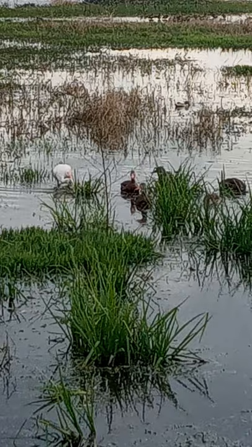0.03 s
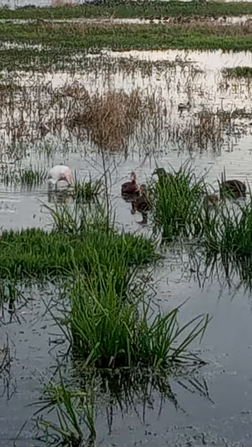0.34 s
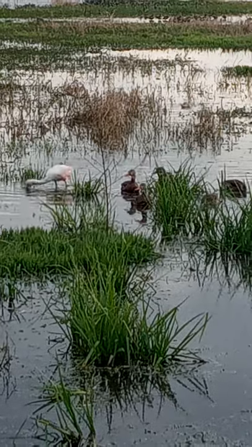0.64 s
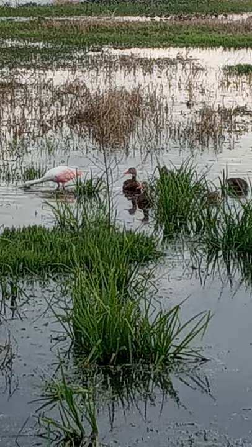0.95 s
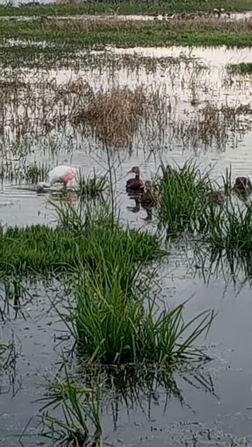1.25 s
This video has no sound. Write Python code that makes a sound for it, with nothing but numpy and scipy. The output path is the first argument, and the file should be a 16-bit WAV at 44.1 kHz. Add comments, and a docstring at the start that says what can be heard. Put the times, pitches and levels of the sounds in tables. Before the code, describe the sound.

Whistling ducks chatter across a marsh, starting with falling whistles and rising chirps, then quick peeps, soft rasps and one light knock. The nearest duck peeps sharply near the end, with faint wind and far birds behind.

```python
"""Whistling ducks chatter across an echoing marsh, heard in mono from the bank.
First come long falling whistles and rising chirps, as a distant flock, far birds and low wind fade in.
Arched peeps and sharp chips run on throughout, each a harmonic tone with a gliding pitch. Near 1 s the
nearest duck peeps piercingly; a small hollow knock follows, then rasps of noise shaped by a throat.
In the last second the piercing peeps return, joined by three harsh squeaks."""
import sys
import numpy as np
from scipy import signal
from scipy.fft import rfft, irfft
from scipy.io import wavfile
from scipy.ndimage import uniform_filter1d, map_coordinates

SR = 44100
rng = np.random.default_rng(int(sys.argv[2]) if len(sys.argv) > 2 else 0)


def put_to_file(sound):
    """Save the sound as 16-bit audio at rate SR, in the file named by the first command-line argument."""
    columns = np.atleast_2d(sound).T  # one column per channel
    safe = np.clip(columns, -1, 1)
    whole_steps = np.round(safe * 32767)
    wavfile.write(sys.argv[1], SR, whole_steps.astype(np.int16))


N = 176400
T = np.arange(N) / SR

# change of harmonics 1-5 over the dive of a peep: gain_db
PEEP_DIVE = [-14.5, -5, -8.5, -15, 3]
# change of harmonics 1-5 over the dive of a chip: gain_db
CHIP_DIVE = [-8.5, 3.5, 3.5, 0, -4]
PEEP_DROP, CHIP_DROP = 0.21, 0.24  # fraction of the top pitch lost over the fall


def voice(pitch_hz, levels_db, dive=0, dive_db=(0, 0, 0, 0, 0)):
    """Harmonic series: overtones follow multiples of one jittering pitch, each fluttering in level."""
    n = len(pitch_hz)
    jitter, flutter_db, cutoff_hz = 0.006, 0.9, 10100
    phase = 2 * np.pi * np.cumsum(pitch_hz * (1 + jitter * wander(n, 390.5))) / SR
    levels = [*levels_db, levels_db[-1] - 10, levels_db[-1] - 20]  # two weaker overtones on top
    tone = np.zeros(n)
    for k, (db, change_db) in enumerate(zip(levels, dive_db), 1):
        hz = k * pitch_hz
        treble_rolloff = (hz < SR / 2) * (.06 + .94 / np.sqrt(1 + (hz / cutoff_hz) ** 44))
        flutter = flutter_db * (k + 1.5) * wander(n, 237.8)
        tone += treble_rolloff * amp(db + change_db * dive + flutter) * np.sin(k * phase)
    return np.sqrt(2) * tone


def arch(drop, dive_db, top_s, rise_s, fall_s, top_hz, *levels_db):
    """Frequency modulation: pitch rises and dives on two parabolas, shifting the harmonic balance."""
    attack_s, release_s = 0.0032, 0.011
    t = np.arange(0, rise_s + fall_s * 1.05 + attack_s / 2, 1 / SR)
    lead_s = rise_s + attack_s / 2
    width_s = np.where(t < lead_s, max(fall_s, 1.7 * rise_s), fall_s)
    bend = ((t - lead_s) / width_s) ** 2
    tone = voice(top_hz * (1 - drop * bend), levels_db, np.minimum(bend, 1), dive_db)
    return top_s - lead_s, gate(t, attack_s, release_s) * tone


def peeps():
    """Arched glides whose lower harmonics fade as the pitch sinks."""
    # peeps: top_s, rise_s, fall_s, top_hz, harmonic1_db, harmonic2_db, harmonic3_db
    notes = [(0.409, 0.039, 0.045, 2475, -52.5, -52.5, -71), (0.614, 0.039, 0.03, 2600, -76, -59.5, -83),
             (0.652, 0.021, 0.081, 2510, -66, -62, -62.5), (0.714, 0.0064, 0.028, 2540, -47, -51, -58),
             (0.791, 0.014, 0.039, 2389.0, -52.5, -52.5, -56), (0.877, 0.005, 0.043, 2504, -67, -52, -64),
             (0.888, 0.012, 0.035, 2423, -57.5, -50.5, -56), (1.041, 0.019, 0.065, 3173, -48.5, -49.5, -59),
             (1.09, 0.034, 0.052, 2526, -53.5, -51.5, -53.5), (1.193, 0.014, 0.03, 2520, -49, -49, -49.5),
             (1.305, 0.023, 0.039, 2436, -55, -45, -50.5), (1.441, 0.017, 0.052, 2236.0, -59, -46.5, -56),
             (1.602, 0.023, 0.098, 2140, -81, -59, -70), (1.74, 0.015, 0.05, 2297, -59.5, -64, -64.5),
             (1.935, 0.024, 0.067, 2840, -56, -56, -80), (1.942, 0.046, 0.034, 2242, -57.5, -50, -56.5),
             (2.038, 0.026, 0.025, 2510, -66, -59, -70), (2.203, 0.025, 0.044, 2458, -50.0, -60.0, -62.5),
             (2.318, 0.035, 0.037, 2570, -80, -62.5, -57.5), (2.528, 0.023, 0.036, 2314, -65, -54.5, -69),
             (2.59, 0.01, 0.034, 2188, -62.0, -57.5, -62), (2.688, 0.011, 0.037, 2277.0, -61.0, -54, -59),
             (2.79, 0.017, 0.035, 2390, -56, -50.5, -55.5), (2.819, 0.011, 0.024, 2840, -50.5, -60.5, -77),
             (2.835, 0.016, 0.034, 2250, -72, -50.5, -61), (2.884, 0.02, 0.044, 2360, -56, -57, -58),
             (2.93, 0.0073, 0.026, 2350, -69, -73, -60.5), (2.985, 0.02, 0.048, 2390, -53, -50.5, -60),
             (3.086, 0.016, 0.046, 2437, -53.5, -47.5, -62), (3.157, 0.02, 0.062, 2547, -50.5, -63, -60.5),
             (3.183, 0.018, 0.045, 2460.0, -52.5, -48.5, -58),
             (3.247, 0.01, 0.034, 2612, -47, -48.5, -63.5), (3.278, 0.025, 0.032, 2440, -46.5, -48.5, -56),
             (3.381, 0.035, 0.025, 2475, -43.5, -49, -52.5), (3.484, 0.018, 0.031, 2482, -43.5, -47, -54),
             (3.572, 0.013, 0.038, 2570, -45, -41, -53), (3.705, 0.017, 0.031, 2450, -49.0, -42.5, -56.5),
             (3.8, 0.017, 0.038, 2415, -48.5, -48.5, -63), (3.903, 0.015, 0.027, 2410, -47, -55, -60),
             (3.976, 0.014, 0.03, 2535.0, -64.0, -44.5, -54.0)]
    return reflect(arch(PEEP_DROP, PEEP_DIVE, *note) for note in notes)


def chips():
    """Short, high glides with most of their energy in the fundamental."""
    # chips: top_s, rise_s, fall_s, top_hz, harmonic1_db, harmonic2_db
    notes = [(0.23, 0.006, 0.019, 4420, -54.5, -87), (0.26, 0.01, 0.027, 3550, -51.5, -81),
             (0.327, 0.006, 0.026, 4340, -53.5, -73), (0.582, 0.01, 0.025, 4380, -51.5, -78),
             (0.641, 0.008, 0.033, 3645, -47.5, -78), (0.845, 0.01, 0.022, 3700, -46, -75),
             (0.967, 0.01, 0.016, 3780, -42, -78), (1.09, 0.01, 0.018, 3750, -45.5, -73),
             (1.232, 0.012, 0.019, 3923, -43.5, -59), (1.307, 0.012, 0.019, 3250, -50, -61),
             (1.352, 0.012, 0.023, 3805, -40.5, -58.5), (1.386, 0.012, 0.065, 3010, -54, -72),
             (1.482, 0.012, 0.019, 4040, -42.5, -66.5), (1.632, 0.012, 0.029, 3960, -46, -69),
             (1.766, 0.012, 0.025, 3985, -45, -81), (1.793, 0.008, 0.035, 3900, -49.5, -64.5),
             (1.919, 0.012, 0.02, 3910, -43, -71), (2.05, 0.01, 0.014, 3880, -53, -59),
             (2.139, 0.006, 0.012, 3750, -57.5, -73), (2.234, 0.006, 0.02, 3730, -52.5, -68.5),
             (2.343, 0.006, 0.014, 3796, -48, -77), (2.408, 0.008, 0.045, 3940, -53.5, -78),
             (2.621, 0.01, 0.017, 3840, -50, -68), (2.965, 0.014, 0.032, 3050, -51.5, -71),
             (3.137, 0.01, 0.025, 3685, -49, -65), (3.267, 0.01, 0.028, 3623, -49, -68),
             (3.697, 0.01, 0.016, 3610, -54, -68), (3.822, 0.006, 0.026, 3155, -55, -71),
             (3.925, 0.008, 0.016, 3260, -52, -75), (3.935, 0.01, 0.015, 3716, -47.5, -79)]
    return reflect(arch(CHIP_DROP, CHIP_DIVE, *note) for note in notes)


def piercing_peeps():
    """Steep glides in which energy shifts to the upper harmonics on the way down."""
    # peeps of the nearest duck: top_s, top_hz, harmonic1_db, harmonic2_db, harmonic3_db
    notes = [(0.97, 2706, -50, -48.5, -56.5), (1.069, 2764, -49.5, -49.5, -69),
             (1.174, 2742, -48.5, -45, -58), (3.342, 2614, -58, -50, -56), (3.44, 2737, -53, -47, -51),
             (3.537, 2790, -50, -43.5, -51.5), (3.638, 2804, -47.5, -42.5, -48.5),
             (3.74, 2754, -51, -43.5, -47), (3.845, 2680, -51, -41, -49)]
    # change of harmonics 1-5 over the dive: gain_db
    flare = [-11, 1, 1.5, 14, 10]
    drop, rise_s, fall_s = 0.32, 0.0105, 0.035
    return reflect(arch(drop, flare, top_s, rise_s, fall_s, *tone) for top_s, *tone in notes)


def whistle(*points):
    """A sustained harmonic tone that follows a smoothed pitch contour."""
    times, pitches, *harmonics = np.transpose(points)
    t = np.arange(times[0] - .003, times[-1] + .0053, 1 / SR)
    levels = [np.interp(t, times, db) for db in harmonics]
    if len(levels) == 1:
        levels.append(levels[0] - 10)
    pitch_hz = uniform_filter1d(np.interp(t, times, pitches), size=600)
    return t[0], gate(t - t[0], .0065, .009) * voice(pitch_hz, levels)


def whistles():
    """Slow glides that hold and then sink; weaker overtones make the pure ones purer."""
    # one contour per near whistle: time_s, pitch_hz, level_db of the first one to three harmonics
    near = [
        [(0.08, 3300, -63, -83), (0.124, 3403, -54, -73), (0.17, 3320, -45, -57)],
        [(.135, 2740, -75, -82, -71), (.165, 3205, -51.5, -55.5, -64), (.2, 3146, -46, -58, -60),
         (.245, 3108, -43, -68, -57.5), (.295, 3142, -41, -52, -57.5), (.312, 3040, -42, -74, -66),
         (.335, 2590, -44.5, -49, -62)],
        [(0.43, 2990, -64, -58, -62), (0.458, 3176, -45, -46.5, -50.5), (0.49, 2950, -41.5, -82, -64),
         (0.504, 2800, -43.5, -56.5, -70), (0.52, 2630, -51, -61, -59)],
        [(0.512, 1663, -52), (0.528, 1746, -46.5), (0.556, 1585, -52.5)],
        [(0.61, 1414, -58), (0.618, 1430, -51), (0.676, 1321, -52), (0.735, 1050, -61.5)],
        [(1.97, 1992, -78, -67, -61), (1.986, 2070, -51, -59, -59), (2.046, 1866, -105, -48, -53.5),
         (2.07, 1730, -58, -55, -54)],
        [(2.71, 1301, -53, -58, -60), (2.76, 1335, -48, -55, -54), (2.82, 1371, -45, -51, -53),
         (2.92, 1376, -52.5, -45.5, -69), (2.99, 1372, -43.5, -55, -73), (3.05, 1330, -46.5, -53.5, -75),
         (3.1, 1252, -51.5, -55, -70), (3.135, 1147, -52.5, -49, -68), (3.16, 987, -52, -75, -57)],
    ]
    # one contour per pure whistle, the first a low undertone beneath a near whistle: time_s, pitch_hz, level_db
    pure = [
        [(0.16, 1617, -63), (0.196, 1588, -69.5), (0.272, 1505, -61), (0.37, 1445, -66)],
        [(1.37, 1080, -70), (1.392, 1100, -59.5), (1.42, 1027, -63)],
        [(1.52, 1854, -77), (1.55, 1764, -50.5), (1.585, 1740, -67)],
        [(1.98, 1780, -56), (1.988, 1773, -50), (2.064, 1643, -57), (2.146, 1403, -62.5), (2.178, 1364, -67.5),
         (2.226, 1226, -58), (2.28, 1140, -77)],
        [(2.02, 696, -66.5), (2.068, 578, -58), (2.09, 562.7, -77)],
        [(3.4, 1647, -58), (3.41, 1666, -54.5), (3.478, 1693, -53), (3.546, 1635, -57.5), (3.622, 1412, -61.5),
         (3.724, 1173, -66.5), (3.76, 1255, -65)],
        [(3.86, 1303, -65), (3.884, 1280, -59.5), (3.94, 1230, -57.5)],
    ]
    return (amp(-1.06) * reflect(whistle(*contour) for contour in near)
            + amp(2.9) * reflect(whistle(*contour) for contour in pure))


def chirps():
    """Upward frequency sweeps that level off along a quarter sine."""
    # chirps: start_s, length_s, first_hz, last_hz, harmonic1_db, harmonic2_db
    notes = [(0.163, 0.038, 3670, 4040, -63, -59.5), (0.359, 0.03, 3440, 3940, -44.5, -64),
             (0.409, .045, 3350, 4450, -47, -64), (0.426, 0.038, 3300, 3950, -67, -51),
             (0.466, 0.022, 3410, 3940, -40.5, -72), (0.563, .036, 3340, 4210, -44, -63.5),
             (0.661, 0.043, 3476, 4060, -45.5, -61), (0.769, 0.051, 4050, 4670, -53, -66)]
    out = np.zeros(N)
    for start_s, length_s, first_hz, last_hz, *levels_db in notes:
        t = np.arange(0, length_s, 1 / SR)
        pitch_hz = first_hz + (last_hz - first_hz) * np.sin(np.pi / 2 * t / length_s)
        out += reflect([(start_s, gate(t, .0077, .03) * voice(pitch_hz, levels_db))])
    return out


def rasps():
    """Source and filter: throbbing noise is shaped by the resonances of a duck's throat."""
    # hoarse rasps: start_s, length_s, level_db
    bursts = [(1.777, 0.057, -56), (1.856, 0.041, -53), (1.91, 0.036, -47), (2.342, 0.071, -60.5),
              (2.609, 0.035, -53), (2.656, 0.07, -49), (3.116, 0.16, -57), (3.94, 0.087, -49.5)]
    # throat response: frequency_hz, gain_db
    throat = [(300, -21), (900, 4.5), (1250, 7.5), (1550, 23.5), (1900, -15.5), (2400, -35), (3200, 13),
              (4400, -32.5), (5400, 5), (7000, -0.5), (11000, -82)]
    out = np.zeros(N)
    for start_s, length_s, db in bursts:
        t = np.arange(0, length_s, 1 / SR)
        puffs = rng.standard_normal(N)[:len(t)] * amp(wander(len(t), 237))
        out += reflect([(start_s, amp(db) * gate(t, .026, .01) * colour(puffs, throat))])
    return out


def squeaks():
    """Brief noise bursts excite high, narrow throat resonances."""
    # harsh squeaks: start_s, length_s, level_db
    bursts = [(3.711, 0.014, -38), (3.812, 0.015, -38), (3.922, 0.016, -39)]
    # throat response: frequency_hz, gain_db
    throat = [(1500, -23), (2400, 8.5), (2750, 12.5), (3150, -13), (3400, -25), (3700, 17.5), (4500, -4),
              (5500, -20), (6400, -2), (8000, -35), (12000, -42)]
    out = np.zeros(N)
    for start_s, length_s, db in bursts:
        t = np.arange(0, length_s, 1 / SR)
        noise = rng.standard_normal(N)[:len(t)]
        out += reflect([(start_s, amp(db) * gate(t, .0067, .012) * colour(noise, throat))])
    return out


def knock(start_s=1.3165, attack_s=0.003):
    """Modal vibration: one light blow sets something hollow ringing in damped sinusoids."""
    # modes of the hollow body: frequency_hz, level_db, t60_s
    modes = [(426, -39, 0.049), (623, -46, 0.048), (1160, -40.5, 0.039), (1505, -36.5, 0.04),
             (2290, -38, 0.035)]
    t = np.arange(0, .15, 1 / SR)
    ring = sum(amp(db - 60 * t / t60) * np.sin(2 * np.pi * hz * t) for hz, db, t60 in modes)
    out = np.zeros(N)
    add(out, start_s, np.minimum(t / attack_s, 1) * ring)
    return out


def reflect(calls, spread_s=0.04):
    """Early reflections: water and reeds return eight weak, delayed copies of each (start_s, call)."""
    out = np.zeros(N)
    for start_s, call in calls:
        add(out, start_s, call)
        for lateness, polarity in rng.random((8, 2)):
            gain = amp(-16) * np.sign(polarity - .5) * np.exp(-lateness)
            add(out, start_s + .002 + spread_s * lateness, gain * call)
    return out


def marsh(sound):
    """Reverberation: reeds and banks scatter sound into a diffuse tail that dies soonest near 4 kHz."""
    # decay of the marsh echo: frequency_hz, t60_s
    decay = [(300, 0.99), (1400, 1), (4000, 0.56), (7000, 1), (11000, 0.9)]
    taps = rng.choice([-1., 1.], SR) * (rng.random(SR) < .06) * (T[:SR] > .012)
    hz, t, spectrum = signal.stft(taps, SR, nperseg=256)
    damping = amp(-60 * t / at_frequency(decay, hz)[:, None])
    tail = signal.istft(spectrum * damping, SR, nperseg=256)[1]
    return signal.fftconvolve(sound, tail / np.linalg.norm(tail))[:N]


def flock(calls_per_s=44, spread_db=12):
    """Superposition: random peeps and chips of distant ducks blend with their echo into chatter."""
    # loudness of the flock: time_s, level_db
    levels = [(0, -60), (.15, -46.5), (.4, -57.5), (.9, -49), (1.1, -47.5), (1.4, -50.5), (1.6, -51.5),
              (2, -55), (2.4, -60.5), (2.6, -53), (2.9, -49.5), (3.3, -48.5), (3.6, -46), (4, -49.5)]
    # colour of the flock: frequency_hz, gain_db
    response = [(1500, -14), (2300, 9), (2800, 4), (3400, 8.5), (3800, 18.5), (4700, 8), (5600, 8.5),
                (6500, 6), (7500, 3.5), (8600, -19), (9700, 5), (11500, -21)]
    calls = np.zeros(N)
    for i, (when, kind, pitch, length, loud) in enumerate(rng.random((int(calls_per_s * N / SR), 5))):
        top_s = (i + when) / calls_per_s
        db = spread_db * loud
        if kind < .7:
            fall_s, top_hz = .04 + .03 * length, 2100 + 400 * pitch
            add(calls, *arch(PEEP_DROP, PEEP_DIVE, top_s, .02, fall_s, top_hz, db - 6, db, db - 5))
        else:
            fall_s, top_hz = .024 + .025 * length, 3100 + 900 * pitch
            add(calls, *arch(CHIP_DROP, CHIP_DIVE, top_s, .012, fall_s, top_hz, db, db - 12))
    return colour(calls + amp(-5) * marsh(calls), response) * envelope(levels)


def far_birds(count=40, low_hz=619.4, high_hz=899.7):
    """Reverberant field: the low glides of far water birds arrive more as echo than as direct sound."""
    # loudness of the far birds: time_s, level_db
    levels = [(0, -70.5), (1, -70), (1.7, -66.5), (2.5, -66.5), (3, -82.5), (4, -73.5)]
    calls = np.zeros(N)
    for i, (when, pitch, length, glide) in enumerate(rng.random((count, 4))):
        start_s = (i + when) / count * T[-1]
        end_s = start_s + .0592 + .0995 * length
        first_hz = low_hz * (high_hz / low_hz) ** (pitch ** 2)
        last_hz = first_hz * (1.05 - .22 * glide)
        add(calls, *whistle((start_s, first_hz, 0), (end_s, last_hz, -4)))
    return unit(.5 * calls + marsh(calls)) * envelope(levels)


def wind(air_db=-65.5):
    """Amplitude-modulated noise: an uneven low rumble under a soft, broad wash of air."""
    # spectrum of the rumble: frequency_hz, gain_db
    rumble_spectrum = [(20, -42), (33, -42), (50, -22), (70, -8), (110, -4), (125, -3.5), (137, 5.5),
                       (158, -5.5), (200, -11.5), (260, -24), (400, -37.5), (1000, -76)]
    # swells of the rumble: time_s, level_db
    swells = [(0.1, -66), (0.18, -47), (0.21, -64), (0.35, -48), (0.59, -53.5), (2.13, -52), (2.2, -58.5),
              (2.32, -47.5), (2.36, -68), (2.39, -52), (2.62, -62), (2.66, -52.5), (2.86, -56), (3.67, -52),
              (3.75, -64.5), (4.0, -55.5)]
    # spectrum of the air over the marsh: frequency_hz, gain_db
    air_spectrum = [(20, 2), (250, 5.5), (380, -3.5), (520, -1), (660, 2), (850, -4.5), (1200, 1.5),
                    (1800, -5), (4000, -10), (8000, -18), (11000, -19), (16000, -19.5)]
    rumble = colour(rng.standard_normal(N), rumble_spectrum) * envelope(swells) * amp(1.2 * wander(N, 16))
    air = colour(rng.standard_normal(N), air_spectrum) * amp(air_db + 2.2 * wander(N, 15))
    return rumble + air


def amp(db):
    """Decibels to amplitude ratio."""
    return 10 ** (np.asarray(db) / 20)


def unit(x):
    """Normalisation to rms 1."""
    return x / np.sqrt(np.mean(x ** 2) + 1e-20)


def envelope(points):
    """Gain over the scene, interpolated from (time_s, level_db) points."""
    return amp(np.interp(T, *np.transpose(points)))


def at_frequency(points, hz):
    """Interpolation on a log-frequency axis."""
    frequencies, values = np.transpose(points)
    return np.interp(np.log(hz + 1), np.log(frequencies + 1), values)


def colour(x, points):
    """Spectral shaping by (frequency_hz, gain_db) points, scaled to rms 1."""
    gain = amp(at_frequency(points, np.fft.rfftfreq(len(x), 1 / SR)))
    return unit(irfft(rfft(x) * gain, len(x)))


def wander(n, rate_hz):
    """Smooth random modulation: a spline through rate_hz random values a second."""
    return map_coordinates(rng.standard_normal(600), [np.arange(n) * rate_hz / SR], order=2, mode="wrap")


def gate(t, attack_s, release_s):
    """An envelope with quarter-sine attack and release."""
    rise = np.sin(np.pi / 2 * np.clip(t / attack_s, 0, 1))
    fall = np.sin(np.pi / 2 * np.clip((t[-1] - t) / release_s, 0, 1))
    return rise * fall


def add(mix, start_s, sound):
    """Superposes a sound on the mix from start_s."""
    part = mix[max(round(start_s * SR), 0):][:len(sound)]
    part += sound[:len(part)]


def scene():
    """Near ducks and the knock sum with their reverberation, over a background that fades in."""
    ducks = amp(.66) * peeps() + amp(2.66) * chips() + piercing_peeps()
    ducks += chirps() + rasps() + squeaks() + whistles()
    silent_s, fade_s, echo_db = 0.075, 0.26, -13.5
    background = (flock() + far_birds() + wind()) * np.clip((T - silent_s) / fade_s, 0, 1)
    blow = knock()
    mono = ducks + blow + amp(echo_db) * marsh(ducks + .5 * blow) + background
    return np.array([mono, mono])


def record(dry):
    """Band limiting: a linear-phase low-pass filter removes the treble above 15.8 kHz."""
    lowpass = signal.firwin(511, 15800, window=("kaiser", 9), fs=SR)
    return signal.oaconvolve(dry, lowpass[None], "same")


dry = scene()
out = record(dry)
put_to_file(out)
```